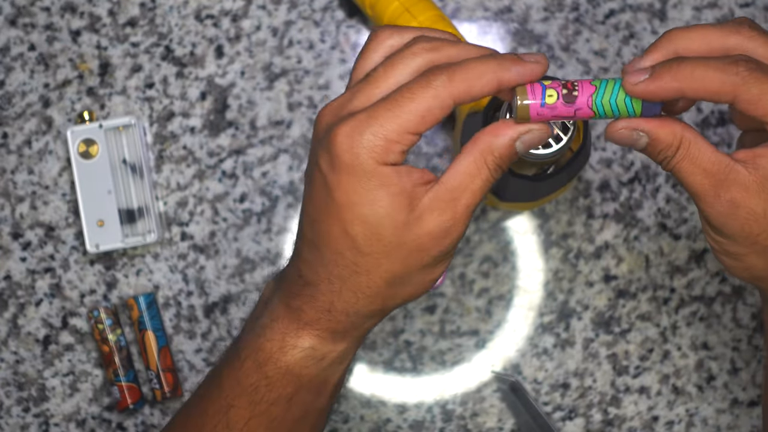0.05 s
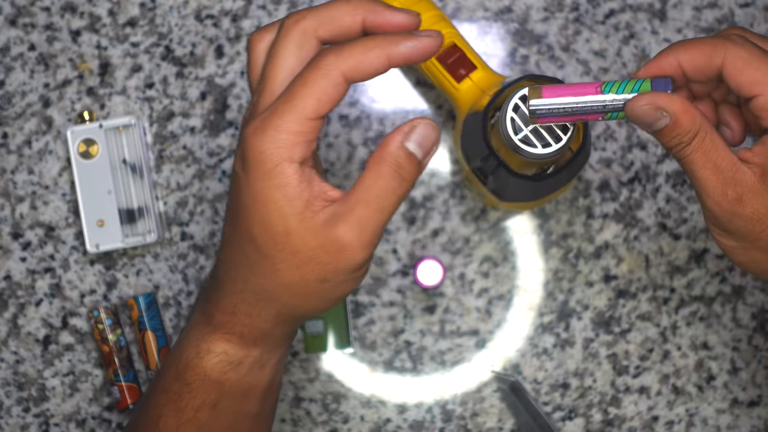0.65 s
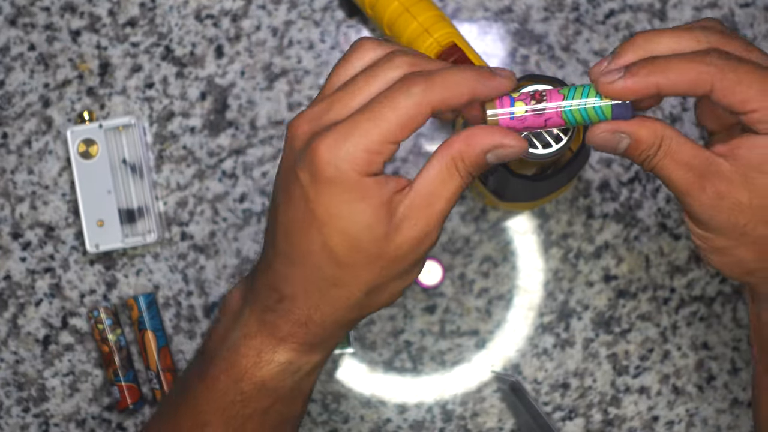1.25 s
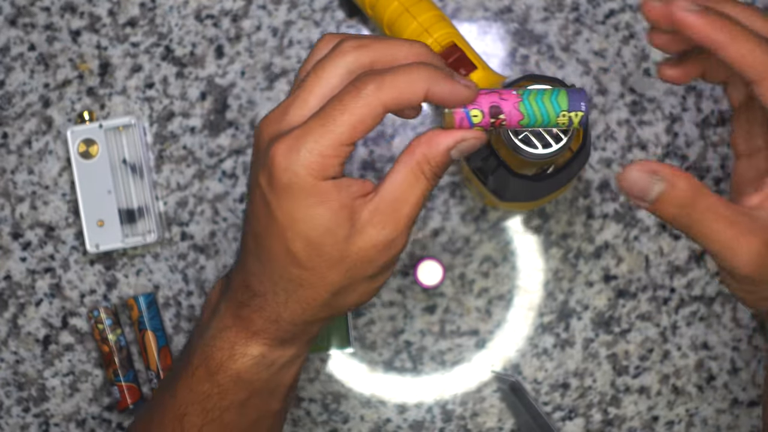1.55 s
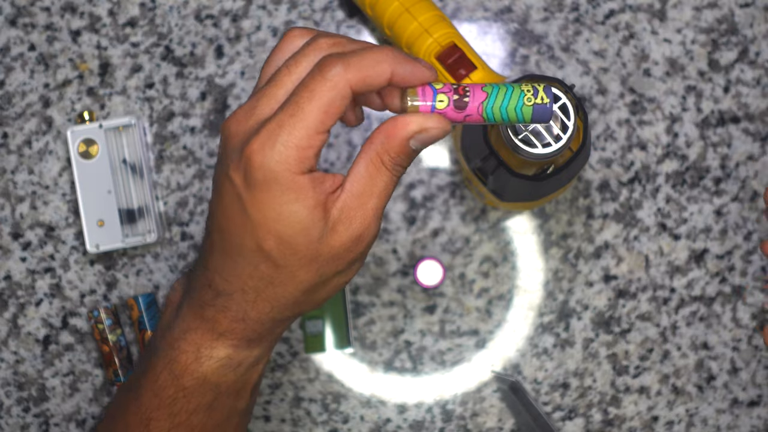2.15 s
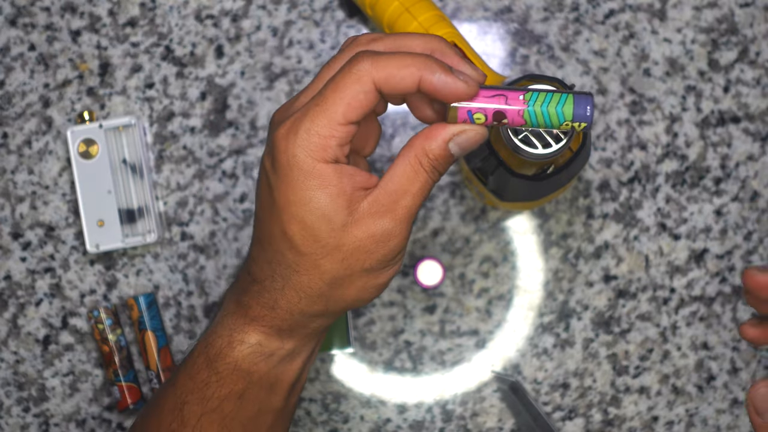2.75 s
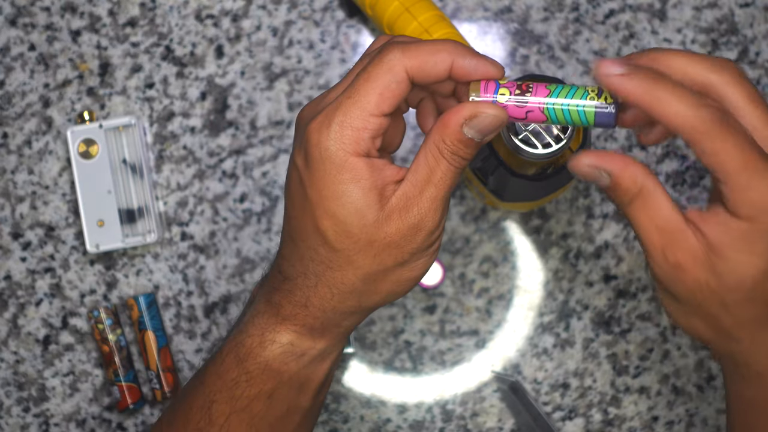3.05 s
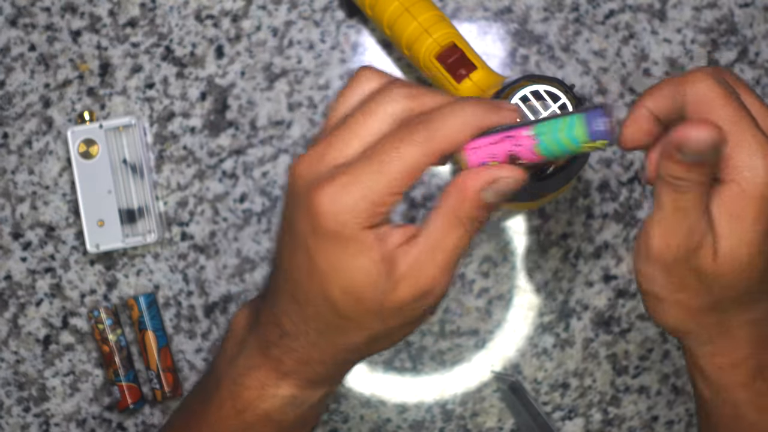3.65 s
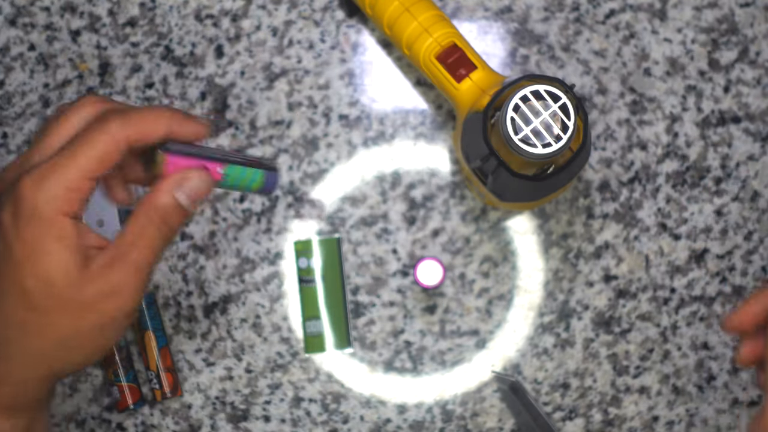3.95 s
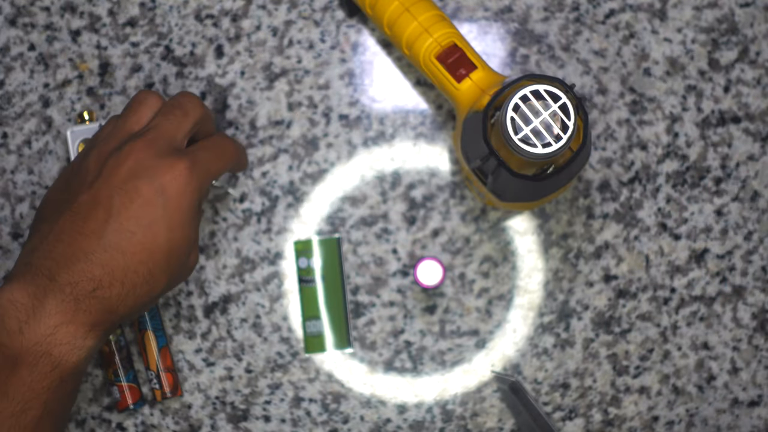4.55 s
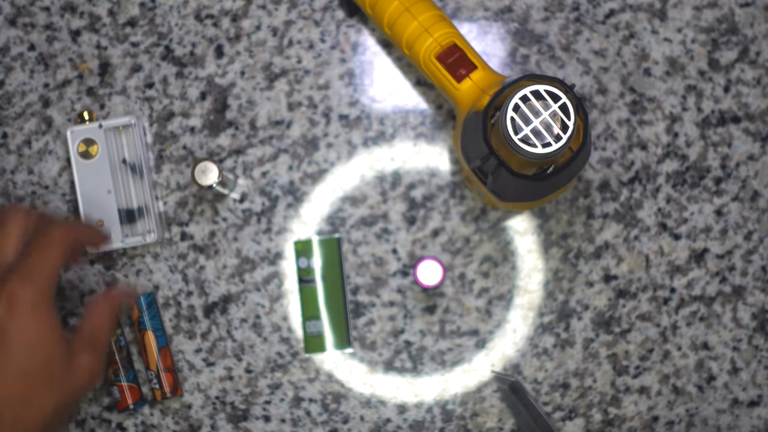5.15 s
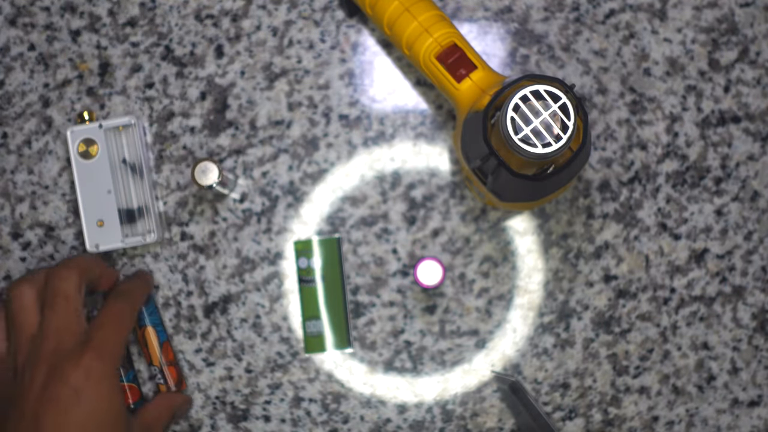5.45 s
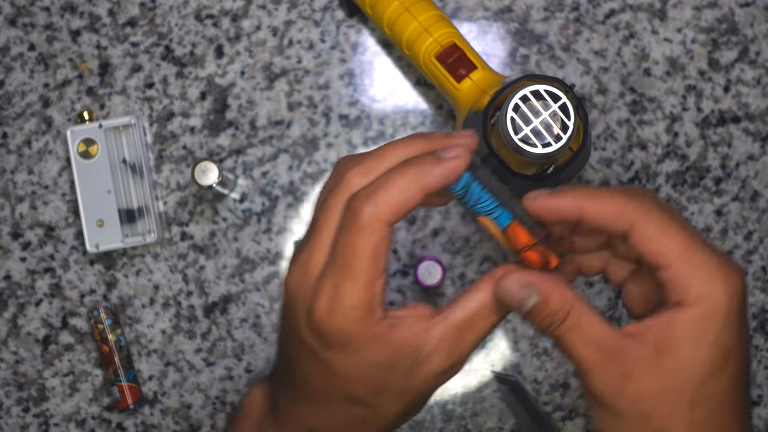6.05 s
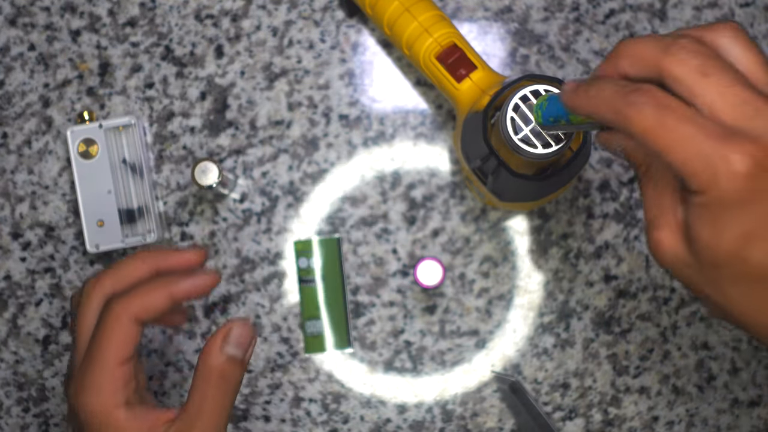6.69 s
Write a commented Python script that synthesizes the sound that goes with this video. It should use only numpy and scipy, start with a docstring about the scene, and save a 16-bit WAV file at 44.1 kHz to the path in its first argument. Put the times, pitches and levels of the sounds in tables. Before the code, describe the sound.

An electric heat gun blows steadily for about seven seconds, close, straight ahead and indoors, already running at the start and never stopping. The main sound is an even midrange rush of air with a bright hiss on top. Within it sit a faint fan whine of nearly constant pitch, a thin high motor buzz and a breathy whistle where the air passes a battery and fingers. A soft hollow hoot flutters throughout, swelling very briefly around 1.8, 2.2, 2.8, 4 and 6 to 6.5 seconds. The hiss shifts subtly in colour as the hands move in the jet, settles a little from about 4.3 to 5.7 seconds when they withdraw, then shifts again as they return. Deflected air makes a very soft low rumble on the microphone from 2.2 to 2.8 seconds and again near 4.5. The overall loudness stays almost constant.

```python
"""Heat gun on a stone counter.

The gun stands nozzle up and blows steadily while hands turn a wrapped battery in the jet.
Air rushes through the barrel, hoots in it and whistles past battery and fingers. The fan whines on
multiples of its shaft speed; the brushes buzz under the mains ripple. The hands shade the hiss, move
away and return; twice a little air is deflected onto the microphone."""
import sys
import numpy as np
from scipy import signal
from scipy.fft import rfft, irfft, next_fast_len
from scipy.io import wavfile
from scipy.ndimage import map_coordinates

SR = 44100
rng = np.random.default_rng(int(sys.argv[2]) if len(sys.argv) > 2 else 0)


def pcm_store(signal):
    """Save signal as 16-bit PCM."""
    levels = np.round(np.clip(np.atleast_2d(signal), -1, 1) * 32767)
    wavfile.write(sys.argv[1], SR, levels.astype(np.int16).T)


N = 305172

# air deflected onto the microphone: (start [s], length [s], rise [dB])
PUFF_EVENTS = [(2.21, 0.56, 13), (4.42, 0.36, 11)]
# its rumble: (frequency [Hz], relative level [dB])
RUMBLE_SPECTRUM = [(20, -23), (34, -13), (58, -4), (90, -4.5), (130, 0.5), (220, -24), (500, -45)]
# whistle past battery and fingers: (time [s], level [dB])
EDGE_DB = [(0, -43.5), (1.2, -42.5), (2.2, -47), (3.0, -50.5), (3.5, -45), (4.7, -47), (5.3, -43.5),
           (6.3, -46), (6.9, -51.5)]
# swells of the barrel's strongest air resonance: (start [s], length [s], rise [dB])
HOOT_EVENTS = [(.845, 0.052, 6), (1.03, 0.21, 4.5), (1.44, .07, 4.5), (1.815, 0.037, 13), (2.15, 0.046, 8),
               (2.75, 0.075, 7), (3.6, 0.28, 4.5), (3.93, 0.038, 11), (4.05, 0.044, 8.5), (5.7, .15, 5),
               (5.96, 0.05, 7), (6.13, 0.091, 7.5), (6.45, 0.064, 7), (6.82, 0.047, 3)]
# motor shaft: (time [s], speed [turns/s])
SHAFT_HZ = [(0, 197.17), (0.7, 197.1), (1.4, 197.49), (1.95, 197.85), (2.45, 197.43), (2.95, 197.49),
            (3.5, 197.28), (4.15, 197.18), (4.7, 197.6), (5.2, 198.02), (5.6, 197.95), (5.95, 198.23),
            (6.4, 198.09), (6.92, 197.77)]
# base level of the brush buzz: (time [s], level [dB])
BUZZ_DB = [(0, -57), (1.1, -54.5), (1.9, -59), (2.5, -55.5), (2.9, -54.5), (3.9, -55.5), (4.8, -52.5),
           (5.5, -53), (6.2, -54), (6.9, -55.5)]
# the motor's metal can, rung by the brushes: (frequency [Hz], relative level [dB])
CAN_SPECTRUM = [(4300, -16), (5100, 3), (5900, 2.5), (6500, -5), (7200, -2.5), (8100, -.5), (8620, -6),
                (9300, -3.5), (10300, -8.5), (10900, -3), (12100, -3), (12700, -6), (13200, -13),
                (13700, -7), (14700, -6), (15800, -17)]
# its loudest modes: (frequency [Hz], width [Hz], level over base [dB], extra swing with base [dB/dB])
CAN_MODES = [(5910, 200, -16, -1), (7140, 340, -16, 0.3), (7880, 400, -9.5, 0), (8280, 200, -18, 0.5),
             (8860, 260, -14, 1), (9400, 380, -15.5, .8), (10960, 520, -10, -.1), (11620, 360, -12.5, 0),
             (12020, 480, -11, -0.4), (12650, 420, -20, 0), (13950, 450, -24, .2)]
# fan and motor tones: (shaft order [1], level [dB], exposure slope [dB/dB], speed slope [dB/(turn/s)])
SHAFT_ORDERS = [(1, -66, 0, 1.5), (2, -54.5, 0, -3), (5, -66, -4, 21), (6, -56, 0, 5), (7, -49, 1, 3.5),
                (8, -54.5, 0.5, 1), (10, -47.5, -0.5, -3.5), (11, -52.5, -0.5, 1), (12, -57, -0.5, 8),
                (13, -59.5, 3, 2.5), (15, -58, -0.5, 2.5), (19, -62.5, -0.5, -7), (20, -55.5, 1.6, 5),
                (21, -59, 2, 0), (22, -55.5, 0.5, 0), (23, -70, 6, -8), (30, -78, 0, 2)]
# how much gets past the hands, used about its mean: (time [s], exposure [dB])
EXPOSURE_DB = [(0.0, -44.5), (0.95, -44.5), (1.49, -47), (1.64, -44), (2.73, -46), (3.91, -43),
               (5.38, -41.5), (6.37, -44.5), (6.52, -43), (6.6, -46.5), (6.85, -45)]
# hiss of the free jet: (frequency [Hz], relative level [dB])
HISS_SPECTRUM = [(2500, -49), (3200, -12), (3550, -6.5), (3800, -0.5), (4400, -6.5), (4700, -9),
                 (5900, -11.5), (6500, -14.5), (9000, -8)]
# grille noise: (frequency [Hz], relative level [dB])
GRILLE_SPECTRUM = [(1200, -64), (1900, -1.5), (2150, -12), (2300, 0.5), (2450, -4), (2800, -2), (3000, -9),
                   (3150, -14.5), (4500, -31)]
# grille noise: (time [s], level [dB])
GRILLE_DB = [(0, -44), (.8, -46), (2.8, -44.5), (3.3, -44.5), (6.25, -45), (6.6, -43)]
# rush through the barrel: (frequency [Hz], relative level [dB])
RUSH_SPECTRUM = [(40, -65), (110, -24.5), (170, -15.5), (215, -11.5), (275, -17.5), (330, -12), (400, -9),
                 (530, -10.5), (660, -4.5), (950, -1), (1100, -2.5), (1400, 0.5), (1850, -2), (2400, -16.5),
                 (3200, -30), (9000, -31.5)]
# the rush, rising while the battery sits deep in the jet: (time [s], level [dB])
RUSH_DB = [(0, -38), (.6, -38.5), (1.9, -37.5), (2.5, -38.5), (4, -38.5), (6.9, -38.5)]
# air resonances and notches of barrel and housing: (frequency [Hz], width [Hz], gain [dB])
BARREL_MODES = [(487, 18, 7), (580, 34, 4), (632, 20, 2), (678, 38, 10.5), (716, 22, -6), (745, 28, 10),
                (776, 16, -3), (796, 20, 4), (903, 18, -4), (934, 30, 6), (983, 24, 5), (1008, 16, -4),
                (1032, 30, 5), (1090, 22, 4), (1190, 30, 2), (1284, 22, 8), (1320, 32, 8.5),
                (1352, 40, 2.5), (1530, 20, -3), (1720, 36, 6), (1762, 22, -5), (1805, 26, 4),
                (1852, 26, 7), (1886, 24, -5), (2098, 24, 5), (2168, 36, 5.5), (2260, 30, -2),
                (2298, 26, 6), (2710, 24, 4)]
# bands opened by finger gaps or shaded by the battery:
# (start [s], length [s], frequency [Hz], width [Hz], gain [dB])
GAP_BANDS = [(0, .22, 8870, 300, 3), (0, .6, 12650, 450, 4), (0, 1.8, 10900, 500, -3),
             (.15, .35, 8350, 350, 5), (.35, 1.3, 5930, 200, 3.5), (.55, 1.1, 8870, 300, 4),
             (1.0, .2, 5000, 900, 2), (1.5, .89, 4350, 120, 3), (1.55, .85, 1330, 220, 2),
             (1.75, 1.1, 3250, 600, -3), (2.0, .25, 5000, 900, 2.5), (2.08, .38, 11060, 450, 9),
             (2.38, .42, 5000, 900, -3.5), (2.65, .5, 9400, 1800, -3.5), (2.95, .17, 2600, 800, 3),
             (3.42, .26, 10950, 400, 2), (3.6, .5, 8900, 700, -3.5), (3.82, .28, 2600, 800, 2),
             (3.85, 1.9, 4350, 120, 3.5), (4.3, 2.0, 6650, 700, -3), (4.5, .5, 7350, 450, 3),
             (5.4, .9, 11620, 350, -4), (5.6, 1.0, 3960, 120, 3), (5.92, .24, 8870, 350, 6),
             (6.4, .6, 5400, 1400, 2.5)]
# treble patches from the moving hands: (frequency [Hz], depth at nearness 1 [dB])
PATCH_DEPTH_DB = [(2000, 0), (5000, 1), (9000, 2.2), (14000, 2.5)]
# hands at the nozzle: (time [s], nearness [0-1])
HAND_NEARNESS = [(0, 1), (3.6, 1), (4.3, .45), (5.7, .45), (6.1, 1), (6.9, 1)]
# stereo width of the gun's sound: (frequency [Hz], side-channel gain [dB])
SIDE_SPECTRUM = [(30, -8), (70, -5), (200, -10), (500, -14), (1000, -13.5), (2200, -20), (3500, -9),
                 (4300, -20), (5300, -22), (6000, -21), (7500, -18), (9500, -13), (12500, -8.5),
                 (15500, -33)]


def amp(db):
    """Decibels to gain."""
    return 10 ** (np.asarray(db) / 20)


def unit(x):
    """Scale to rms 1."""
    return x / np.sqrt(np.mean(x ** 2) + 1e-20)


def along(points, hz):
    """Read (frequency, value) points on a log axis."""
    points_hz, values = np.transpose(points)
    return np.interp(np.log(hz + 1), np.log(points_hz + 1), values)


def curve(points):
    """Read (time, value) points at every sample."""
    return np.interp(np.arange(N) / SR, *np.transpose(points))


def wobble(rate_hz):
    """Smooth random curve through rate_hz knots a second."""
    knots = rng.standard_normal(int(N * rate_hz / SR) + 4)
    coarse = np.arange(0, N + 64, 64)
    smooth = map_coordinates(knots, [coarse * rate_hz / SR], mode="nearest")
    return np.interp(np.arange(N), coarse, smooth)


def gate(t, start_s, length_s, ramp_s):
    """Trapezoid from 0 to 1 and back."""
    return np.clip(.5 + np.minimum(t - start_s, start_s + length_s - t) / ramp_s, 0, 1)


def swells(events, ramp_s=.03):
    """Summed rise of the events in dB, per sample."""
    t = np.arange(N) / SR
    return sum(db * gate(t, start_s, length_s, ramp_s) for start_s, length_s, db in events)


def filtered(x, response):
    """Apply the gain response(hz) to x."""
    size = next_fast_len(N + SR // 2)
    return irfft(rfft(x, size) * response(np.fft.rfftfreq(size, 1 / SR)), size)[..., :N]


def noise(response):
    """Shaped noise of rms 1."""
    return unit(filtered(rng.standard_normal(N), response))


def bell(hz, centre_hz, width_hz):
    """Resonance curve, 1 at its centre."""
    return 1 / (1 + (2 * (hz - centre_hz) / width_hz) ** 2)


def resonate(x, centre_hz, width_hz):
    """One resonance with steep skirts."""
    q = centre_hz / width_hz
    stages = [np.concatenate(signal.iirpeak(centre_hz, stage_q, SR)) for stage_q in (q, q / 2)]
    return signal.sosfilt(stages * 2, x)


def reflections(x, first_s, last_s, count):
    """Echoes off nearby surfaces, total energy about 1."""
    delays = (rng.uniform(first_s, last_s, count) * SR).astype(int)
    taps = np.bincount(delays, rng.choice([-1., 1.], count)) / np.sqrt(count)
    return signal.fftconvolve(x, taps)[:N]


def draught(rest_db=-78, swing_db=3.5):
    """Deflected air rumbles softly on the microphone."""
    level_db = rest_db + swells(PUFF_EVENTS) + swing_db * wobble(14)
    return amp(level_db) * noise(lambda hz: amp(along(RUMBLE_SPECTRUM, hz)))


def edge_whistle():
    """The jet splits on battery and fingers: a breathy, fluttering band."""
    level_db = curve(EDGE_DB) + 0.8 * wobble(12)
    return amp(level_db) * noise(lambda hz: bell(hz, centre_hz=2097, width_hz=175))


def hoot(rest_db=-47.5, flutter_db=2.2, low_hz=839, high_hz=870, width_hz=36):
    """The barrel's air column flutters and now and then locks into a steadier swell."""
    rise_db = swells(HOOT_EVENTS)
    level_db = rest_db + rise_db + flutter_db * amp(-rise_db) * wobble(24)
    column = noise(lambda hz: bell(hz, low_hz, width_hz) ** 2 + 1.1 * bell(hz, high_hz, width_hz) ** 2)
    envelope = np.abs(signal.hilbert(column))
    saturated = column / np.sqrt(1 + 2 * envelope ** 2)
    return amp(level_db) * unit(saturated)


def shaft(mains_hz=60, nudge_turns=.0036):
    """Turns made and motor current; each pulse of half-wave mains nudges the shaft ahead."""
    mains_phase = 2 * np.pi * mains_hz * np.arange(N) / SR
    turns = np.cumsum(curve(SHAFT_HZ)) / SR - nudge_turns * np.cos(mains_phase)
    current = np.maximum(np.sin(mains_phase), 0)
    return turns, current


def commutator(turns, current, ripple=0.5):
    """The same scrape on every turn, plus sparks; harder in each pulse of current."""
    roughness = rng.standard_normal(216)  # one turn
    whitened = irfft(np.exp(1j * np.angle(rfft(roughness))))
    track = signal.resample(whitened, 16 * len(whitened))
    scrape = unit(np.interp(turns % 1, np.arange(len(track)) / len(track), track))
    sparks = .36 * rng.standard_normal(N)
    high_bar = 1 + 0.28 * np.cos(2 * np.pi * turns)  # one bar stands proud
    return (scrape + sparks) * high_bar * (1 + ripple * current)


def brushes(turns, current, chatter_turns=.0007, chatter_hz=110):
    """Brushes chatter on the commutator and ring the motor can's treble modes."""
    base_db = curve(BUZZ_DB)
    swing_db = base_db - base_db.mean()
    drive = commutator(turns + chatter_turns * wobble(chatter_hz), current)
    buzz = amp(base_db - 3) * unit(filtered(drive, lambda hz: amp(along(CAN_SPECTRUM, hz))))
    for centre_hz, width_hz, db, slope in CAN_MODES:
        buzz += amp(base_db + db + slope * swing_db) * unit(resonate(drive, centre_hz, width_hz))
    return buzz


def whine(turns, cruise_hz=197.6, waver_rad=.09):
    """Fan and motor tones: levels follow hands and speed; turbulence makes each waver."""
    exposure_db = curve(EXPOSURE_DB)
    exposure_db -= exposure_db.mean()
    overspeed_hz = curve(SHAFT_HZ) - cruise_hz
    tones = np.zeros(N)
    for order, db, exposure_slope, speed_slope in SHAFT_ORDERS:
        level_db = db + exposure_slope * exposure_db + speed_slope * overspeed_hz
        level_db += 1.04 * wobble(2.45) + 0.89 * wobble(22)
        waver = waver_rad * wobble(30)
        phase = 2 * np.pi * (order * turns + rng.random()) + waver
        tones += np.sqrt(2) * amp(level_db) * np.sin(phase)
    return tones


def airflow(hiss_mean_db=-49, hiss_cutoff_hz=6600):
    """Turbulence in the barrel, at the grille and in the free jet."""
    modes_db = lambda hz: sum(db * bell(hz, centre, width) for centre, width, db in BARREL_MODES)
    roll_off = lambda hz: 1 / np.sqrt(1 + (hz / hiss_cutoff_hz) ** 8)
    rush_db = curve(RUSH_DB) + 0.44 * wobble(17)
    rush = amp(rush_db) * noise(lambda hz: amp(along(RUSH_SPECTRUM, hz) + modes_db(hz)))
    grille_db = curve(GRILLE_DB) + 0.94 * wobble(8)
    grille = amp(grille_db) * noise(lambda hz: amp(along(GRILLE_SPECTRUM, hz) + modes_db(hz)))
    exposure_db = curve(EXPOSURE_DB)
    hiss_db = hiss_mean_db + 0.49 * (exposure_db - exposure_db.mean())
    hiss = amp(hiss_db) * noise(lambda hz: amp(along(HISS_SPECTRUM, hz)) * roll_off(hz))
    air = rush + grille + hiss
    return air + .08 * reflections(air, first_s=.004, last_s=.025, count=14)


def past_the_hands(x, ramp_s=.16, patch_width_hz=260, patches_per_s=4.5):
    """Hands and battery open or shade bands; random treble patches deepen as the hands near."""
    hz, t, spectra = signal.stft(x, SR, nperseg=1024)
    gaps_db = sum(db * np.outer(bell(hz, centre_hz, width_hz), gate(t, start_s, length_s, ramp_s))
                  for start_s, length_s, centre_hz, width_hz, db in GAP_BANDS)
    rows, columns = hz / patch_width_hz, t * patches_per_s
    knots = rng.standard_normal((int(rows[-1]) + 2, int(columns[-1]) + 2))
    patches = map_coordinates(knots, np.meshgrid(rows, columns, indexing="ij"), mode="nearest")
    nearness = np.interp(t, *np.transpose(HAND_NEARNESS))
    depth_db = np.outer(along(PATCH_DEPTH_DB, hz), nearness)
    _, shaded = signal.istft(spectra * amp(gaps_db + depth_db * patches), SR, nperseg=1024)
    return shaded[:N]


def scene():
    """Gun straight ahead, with a little stereo width."""
    turns, current = shaft()
    gun = airflow() + hoot() + edge_whistle() + brushes(turns, current) + whine(turns)
    mid = past_the_hands(gun) + draught()
    echoes = reflections(mid, first_s=.003, last_s=.09, count=90)
    side = filtered(echoes, lambda hz: amp(along(SIDE_SPECTRUM, hz)))
    return np.array([mid + side, mid - side])


def record(dry):
    """Brick-wall low-pass."""
    return filtered(dry, lambda hz: hz < 15760)


dry = scene()
out = record(dry)
pcm_store(out)
```